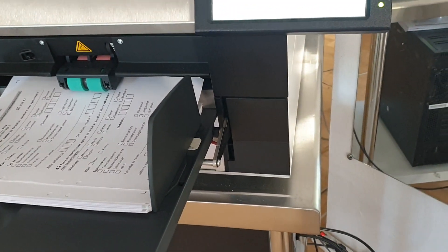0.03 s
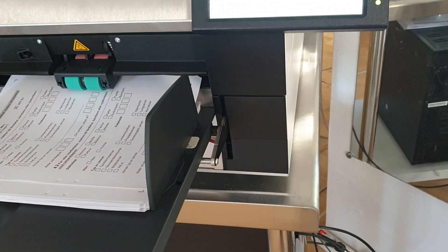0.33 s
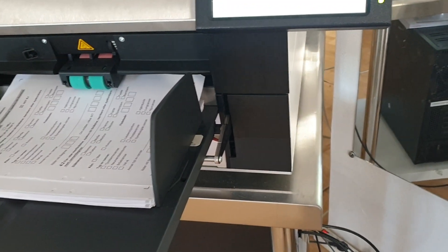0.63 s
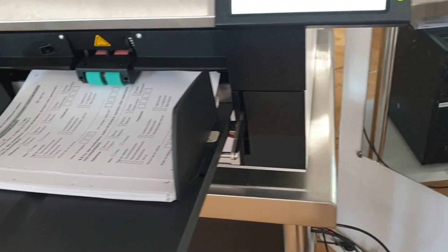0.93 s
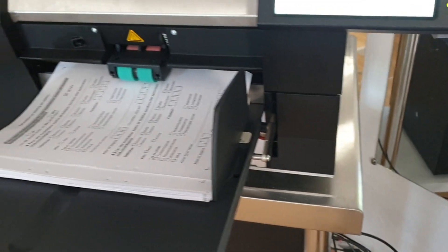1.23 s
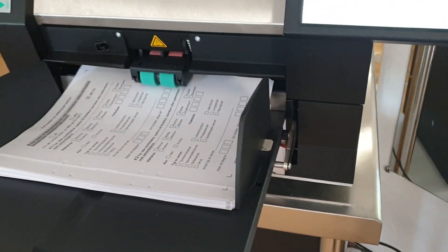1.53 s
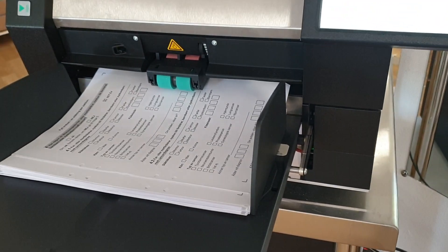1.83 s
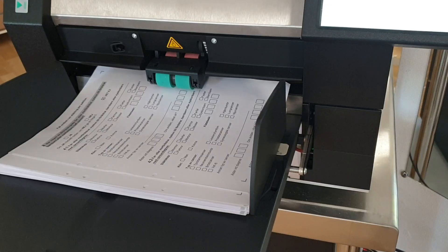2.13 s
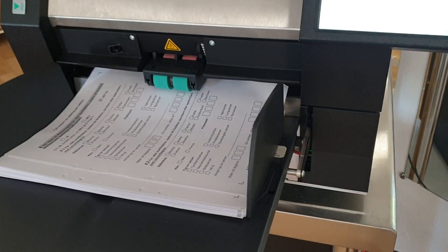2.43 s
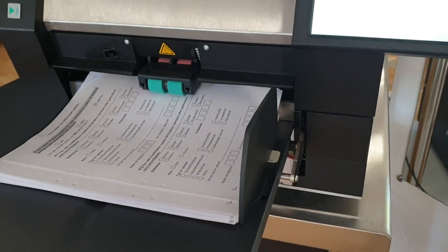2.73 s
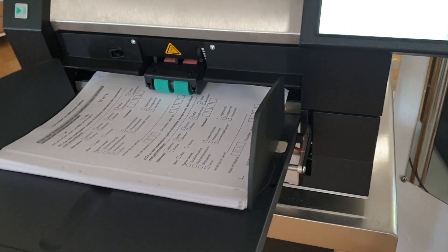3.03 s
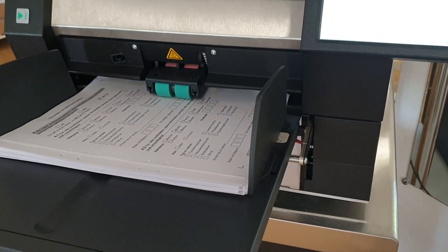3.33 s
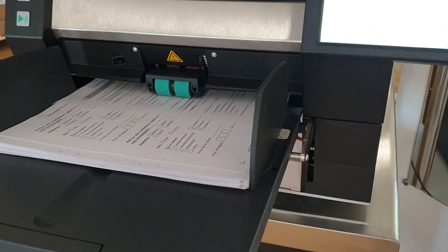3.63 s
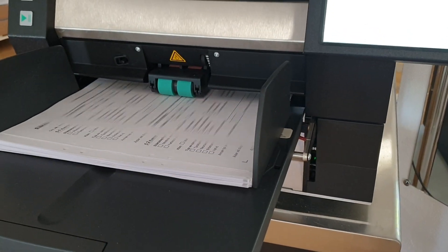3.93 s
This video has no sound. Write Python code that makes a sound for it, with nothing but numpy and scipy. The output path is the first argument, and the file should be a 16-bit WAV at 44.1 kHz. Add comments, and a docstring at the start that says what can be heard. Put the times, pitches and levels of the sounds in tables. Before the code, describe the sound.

A large office scanner clunks, whines up to a whirr and starts feeding paper.

```python
"""A faint fan and hum, with soft rustles: a large office scanner idles in a small room.
A clutch clunks in, ringing the frame and metal parts. Three drive motors whine up one after another,
their gears chattering through a critical speed, and belts and rollers settle into a steady whirr.
The feeder clacks, the tray booms and a first sheet slides off the stack.
The left microphone is the stronger."""
import sys
import numpy as np
from scipy import signal
from scipy.fft import rfft, irfft, next_fast_len
from scipy.io import wavfile
from scipy.ndimage import map_coordinates

SR = 44100
rng = np.random.default_rng(int(sys.argv[2]) if len(sys.argv) > 2 else 0)


def put_to_file(sound):
    """Save the sound as 16-bit audio at rate SR, in the file named by the first command-line argument."""
    columns = np.atleast_2d(sound).T  # one column per channel
    safe = np.clip(columns, -1, 1)
    whole_steps = np.round(safe * 32767)
    wavfile.write(sys.argv[1], SR, whole_steps.astype(np.int16))


N = 176400
T = np.arange(N) / SR


def amp(db):
    """Decibels to gain."""
    return 10 ** (np.asarray(db) / 20)


def unit(x):
    """Scale to rms 1."""
    return x / np.sqrt(np.mean(x ** 2) + 1e-20)


def in_time(rows):
    """Columns of a time curve, per sample."""
    time_s, *columns = np.transpose(rows)
    return [np.interp(T, time_s, column) for column in columns]


def at_hz(points, hz):
    """Read a spectrum on a log-frequency axis."""
    freq_hz, values = np.transpose(points)
    return np.interp(np.log(hz + 1e-9), np.log(freq_hz), values)


def drift(rate_hz):
    """Smooth random wander, rms 1."""
    hop, settle = 40, 2000
    pole = np.exp(-2 * np.pi * rate_hz * hop / SR)
    white = rng.standard_normal(N // hop + settle + 2)
    slow = signal.lfilter([1], [1, -2 * pole, pole ** 2], white)[settle:]
    return np.interp(np.arange(N) / hop, np.arange(len(slow)), unit(slow))


def narrow_noise(hz, width_hz, stages=1):
    """White noise through resonators in series, rms 1."""
    pole = np.exp(-np.pi * width_hz / SR)
    x = rng.standard_normal(N)
    for _ in range(stages):
        x = signal.lfilter([1, 0, -1], [1, -2 * pole * np.cos(2 * np.pi * hz / SR), pole ** 2], x)
    return unit(x)


def swell(start_s, level_db, attack_s, decay_s):
    """Envelope: up 20 dB per attack_s until start_s, then down 60 dB per decay_s."""
    rise_db = 20 * np.minimum(T - start_s, 0) / attack_s
    fall_db = 60 * np.maximum(T - start_s, 0) / decay_s
    return amp(level_db + rise_db - fall_db)


def room(x, wet_db, t60_s):
    """Direct sound plus a short diffuse tail, different per channel."""
    t = T[:SR // 2]
    tail = rng.standard_normal((2, len(t))) * amp(-60 * t / t60_s) * (t > .003)
    tail /= np.sqrt(np.sum(tail ** 2, axis=1, keepdims=True))
    return x + amp(wet_db) * signal.fftconvolve(x[None], tail, axes=1)[:, :N]


# left-right likeness of diffuse sound: freq_hz, coherence
COHERENCE = [(60, .8), (200, .92), (1000, .78), (3000, .5), (16000, .4)]

def noise(spectrum, flicker_db=0, size=N):
    """Stereo noise in third-octave bands with optional independent flicker, rms 1."""
    out, edges_hz = 0, 22 * 2 ** (np.arange(30) / 3)
    white = rng.standard_normal((2, 2, size + SR // 4))
    for k, (low, high) in enumerate(zip(edges_hz, edges_hz[1:])):
        band = signal.butter(2, [low, high], "band", fs=SR, output="sos")
        mid, side = signal.sosfilt(band, white[k % 2])[:, -size:]
        hz = np.sqrt(low * high)
        alike = at_hz(COHERENCE, hz)
        gain = amp(at_hz(spectrum, hz) + (flicker_db * drift(24)[:size] if flicker_db else 0))
        out += gain * (np.sqrt(1 + alike) * mid + np.sqrt(1 - alike) * side * [[1], [-1]])
    return unit(out)


# faint rustles, soft shuffles, low bump: start_s, level_db, attack_s, decay_s
RUSTLES = [(.44, -65.5, 0.059, 0.85), (.81, -65.5, .04, 0.37), (1.362, -54.5, 0.032, 0.61),
           (1.735, -59.5, 0.013, 0.34)]
SHUFFLES = [(.01, -58.5, 0.037, 0.45), (.78, -65.5, 0.099, 0.7)]
BUMPS = [(1.745, -43, 0.039, 0.61)]

def stirrings():
    """Rustles, shuffles, a thin hiss and a low bump swell and fade before the start."""
    bright = noise([(500, 10.5), (2500, -9), (5200, -3.5), (6800, -9.5), (9500, -1.5), (16000, -8)])
    dull = noise([(200, -3), (800, -6), (2800, -9), (5000, -28)])
    rustle = sum(swell(*row) for row in RUSTLES) * bright
    shuffle = sum(swell(*row) for row in SHUFFLES) * dull
    hiss = narrow_noise(hz=11100, width_hz=1200, stages=2)
    hiss *= swell(start_s=1.22, level_db=-73.5, attack_s=.41, decay_s=1.8)
    bump = sum(swell(*row) for row in BUMPS) * np.sin(2 * np.pi * 47 * T + 1.2 * drift(7.6))
    return rustle + shuffle + hiss + bump


# fan noise: freq_hz, density_db
FAN_SPECTRUM = [(25, -31), (42, -10), (60, -21), (100, -4), (140, 1), (300, -6), (640, -17), (1000, -19.5),
                (1300, -25), (2200, -23), (4000, -34.5), (7000, -43.5), (11000, -34)]

def fan():
    """The idling fan: a low rush and a narrow whine."""
    whine = amp(-73.5) * narrow_noise(hz=2185, width_hz=180, stages=2)
    return whine + amp(-57.5) * noise(FAN_SPECTRUM, flicker_db=1.2)


# mains and electronics: pitch_hz, level_db
HUM_TONES = [(53.8, -65.5), (80.7, -65.5), (980, -78.5), (2068, -76), (2137, -73.5), (3340, -85.5),
             (3860, -81.5), (10002, -87)]

def hum():
    """Mains and electronics tones, wavering in phase and level."""
    out = 0
    for hz, db in HUM_TONES:
        tone = np.sqrt(2) * np.sin(2 * np.pi * hz * T + .5 * drift(2.7))
        out += amp(db) * tone * (1 + .45 * drift(17))
    return out


# motor electronics: centre_hz, level_db
WHISTLES = [(13428, -77), (13780, -74), (14400, -77), (15100, -75), (15563, -71)]

def motor_electronics():
    """The running motors' electronics hiss in narrow bands."""
    fade_in = np.clip((T - 2.7) / .12, 0, 1)
    return fade_in * sum(amp(db) * narrow_noise(hz, width_hz=60) for hz, db in WHISTLES)


# belts and rollers running: time_s, level_db
WHIRR_LEVEL = [(2.34, -110), (2.4, -31.5), (2.6, -52), (2.8, -42), (3.22, -42), (3.38, -39.5), (3.7, -42.5),
               (4, -36.5)]
# their whirr: freq_hz, density_db
WHIRR_SPECTRUM = [(40, -21), (100, -25.5), (150, -2.5), (250, -9.5), (400, -4), (600, -7), (760, -16),
                  (1100, -6), (1600, -17), (2250, -18.5), (2900, -32), (3900, -28.5), (6000, -33.5),
                  (8500, -37.5), (12000, -33)]
# housing resonances: centre_hz, width_hz, level_db
HOUSING_RINGS = [(460.6, 21, -58), (606, 61, -64.5), (633.3, 10, -54), (1133, 103, -49.5),
                 (2300, 290, -63.5), (3710, 91, -58.5), (4440, 190, -70)]

def rollers():
    """Belts and rollers whirr and rattle the housing."""
    level_db, = in_time(WHIRR_LEVEL)
    settled_db = level_db[-SR:].mean()
    rattle = sum(amp(db) * narrow_noise(hz, width_hz) for hz, width_hz, db in HOUSING_RINGS)
    whirr = amp(level_db) * noise(WHIRR_SPECTRUM, flicker_db=3)
    return whirr + amp(level_db - settled_db) * room(rattle, wet_db=-4.5, t60_s=.54)


# sliding sheet, feed roller hum: time_s, level_db
SLIDE_LEVEL = [(3.55, -100), (3.58, -36), (3.66, -42.5), (3.78, -41), (3.84, -37.5), (3.89, -47),
               (3.94, -66), (3.965, -37.5), (4, -46)]
FEED_LEVEL = [(3.54, -100), (3.58, -47), (3.68, -52.5), (3.78, -39), (3.87, -42), (4, -53)]
# paper friction: freq_hz, density_db
PAPER_SPECTRUM = [(60, 10), (200, 11.5), (700, -2), (2000, 1), (6500, -4.5), (10000, -0.5), (16000, -3)]

def sheet_feed():
    """The feed roller hums while paper slides over paper."""
    roller_hz = 161.5 * (1 + .0081 * drift(8.4))
    roller = np.sqrt(2) * np.sin(2 * np.pi * np.cumsum(roller_hz) / SR)
    slide = noise(PAPER_SPECTRUM, flicker_db=1.5) * amp(1.14 * drift(100))
    return amp(in_time(SLIDE_LEVEL)[0]) * slide + amp(in_time(FEED_LEVEL)[0]) * roller


def tray_boom():
    """The tray booms under the feeder's blow."""
    envelope = swell(start_s=3.566, level_db=-28.5, attack_s=.0034, decay_s=.27)
    return envelope * np.sin(2 * np.pi * 204.6 * T + 1.47 * drift(37))


def struck(starts_s, hits_db, modes, spectrum, modes_db, dense_db,
           crack_t60_s, tail_db, tail_t60_s, clatter_db):
    """Each hit rings a part's modes, plus dense ringing: a short crack and a longer tail."""
    out, t = np.zeros((2, N + SR)), T[:SR]
    dense = unit(noise(spectrum, size=2 * SR) * amp(clatter_db * drift(165)[:2 * SR]))
    envelope = amp(dense_db) * (amp(-60 * t / crack_t60_s) + amp(tail_db - 60 * t / tail_t60_s))
    attack = 1 - np.exp(-t / .00014)
    for start_s, hit_db in zip(starts_s, hits_db):
        start, pick = int(start_s * SR), rng.integers(SR)
        ringing = envelope * dense[:, pick:pick + SR]
        for hz, db, t60_s in modes:
            decay = amp(modes_db + db + rng.normal(0, .4) - 60 * t / t60_s)
            ringing += decay * np.sin(2 * np.pi * hz * t) * rng.choice([-1, 1])
        out[:, start:start + SR] += amp(hit_db) * ringing * attack
    return out[:, :N]


# clutch and feeder contacts: start_s, thud_db, clang_db, snap_db
KNOCKS = [(2.35, -20, -63, -62), (2.3601, -18.5, -0.5, -16), (2.3647, -10, -5.5, -4.5),
          (2.367, -7, -24, -32), (2.381, -28, -17, -20), (2.398, -32, -18, -21), (2.4995, -17.5, -60, -60),
          (3.398, -43, -35, -35), (3.556, -15, -55, -54), (3.564, -31, -35, -11.5), (3.567, -33, -54, -6.5),
          (3.5705, -22, -35, -16), (3.5795, -24, -23, -14), (3.695, -50, -26.5, -21.5),
          (3.831, -48, -26, -19), (3.9468, -43, -20.5, -15)]
# modes of the struck parts: pitch_hz, gain_db, t60_s
FRAME_MODES = [(150.4, -13, 0.51), (550, 1.5, 0.077), (662, -5.5, 0.069), (1183, 2.5, 0.042),
               (1580, -6.5, .13), (1772, -9, 0.13)]
CLUTCH_MODES = [(3214, -5, .28), (3370, 6, .045), (3978, -13, .2), (5080, -13, .28), (5250, -3, .035),
                (5443, -15, .22), (5750, -18, .16), (8646, -20, .2), (9100, -7, .04)]
LATCH_MODES = [(2080, -2, 0.0087), (3835, 0, 0.03), (4185, -3, 0.023)]
# dense ringing around those modes: freq_hz, density_db
FRAME_SPECTRUM = [(60, -33), (140, -17), (270, -1), (550, 15), (1100, 1.5), (1800, -6), (2600, -14),
                  (6000, -42), (16000, -17)]
CLUTCH_SPECTRUM = [(300, -51), (1700, 3.5), (2600, -17), (3400, 9), (4400, -4.5), (5400, -4), (6900, -16),
                   (8700, -9.5), (16000, -25)]
LATCH_SPECTRUM = [(300, -20), (2000, 12), (4000, 8.5), (7000, 5), (9500, 7), (12000, 14.5), (16000, -10)]

def knocks():
    """Contacts thud in the frame, clang in the clutch metal and snap in the feeder latch."""
    starts_s, thud_db, clang_db, snap_db = np.transpose(KNOCKS)
    thud = struck(starts_s, thud_db, FRAME_MODES, FRAME_SPECTRUM, modes_db=-15, dense_db=-12.5,
                  crack_t60_s=.055, tail_db=-11, tail_t60_s=1, clatter_db=2.5)
    clang = struck(starts_s, clang_db, CLUTCH_MODES, CLUTCH_SPECTRUM, modes_db=-18, dense_db=-21,
                   crack_t60_s=.057, tail_db=-4, tail_t60_s=.56, clatter_db=1.5)
    snap = struck(starts_s, snap_db, LATCH_MODES, LATCH_SPECTRUM, modes_db=-13.5, dense_db=-12.5,
                  crack_t60_s=.02, tail_db=-24.5, tail_t60_s=.33, clatter_db=0)
    return thud + clang + snap


# hiss of the gear teeth: freq_hz, density_db
RASP_SPECTRUM = [(1000, 7), (2500, 8), (5500, 2), (8000, -1), (12000, 4), (16000, -17)]

def drive(run_up, partials, chatter_partials, jitter, rough, throb, grit,
          chatter_db, critical_hz, critical_width_hz, rasp_db=None):
    """Gear-mesh tone, throbbing once per pinion turn, and its chatter near the critical speed."""
    mesh_hz, level_db = in_time(run_up)
    phase = 2 * np.pi * np.cumsum(mesh_hz * (1 + jitter * drift(30.7))) / SR
    pinion_teeth, tone = 11, 0
    for k, db in partials:
        partial = np.sin(k * phase) * (1 + rough * drift(63))
        tone += amp(db) * (partial + grit * drift(130) * np.cos(k * phase))
    tone *= 1 + throb * np.sin(phase / pinion_teeth)
    chatter = sum(amp(db) * np.sin(k * phase) * (1 + .4 * drift(90)) for k, db in chatter_partials)
    if rasp_db is not None:
        chatter += amp(rasp_db) * noise(RASP_SPECTRUM)[0] * (1 + np.sin(phase))
    chatter *= amp(chatter_db) / (1 + ((mesh_hz - critical_hz) / critical_width_hz) ** 4)
    fade_in = np.clip((T - run_up[0][0]) / .022, 0, 1)
    envelope = np.sqrt(2) * amp(level_db) * fade_in
    return envelope * tone, envelope * chatter


# gear-mesh tone of each drive: time_s, pitch_hz, level_db
MAIN_RUN_UP = [(2.39, 220, -46), (2.44, 400, -37), (2.458, 465, -29.5), (2.49, 585, -31),
               (2.52, 750, -32.5), (2.537, 860, -28), (2.572, 990, -24.5), (2.607, 1130, -20),
               (2.626, 1225, -24), (2.655, 1154, -34), (2.72, 1118, -49)]
SECOND_RUN_UP = [(2.48, 380, -38), (2.54, 530, -36.5), (2.6, 690, -40), (2.66, 850, -38), (2.705, 985, -32),
                 (2.73, 1035, -30), (2.8, 1210, -44.5), (2.84, 1160, -53.5), (4, 1145, -60)]
BELT_RUN_UP = [(2.6, 617, -57), (2.67, 740, -60), (2.72, 850, -46), (2.78, 1000, -44.5), (2.87, 1159, -43),
               (3.1, 1150, -41.5), (3.3, 1147, -40.5), (4, 1151, -44)]
# partials of the tones and of the chatter: mesh_multiple, gain_db
GEAR_PARTIALS = [(1, -1), (2, -33)]
BELT_PARTIALS = [(.28, -10), (.355, -12), (.5, -11), (.795, -14), (.897, -16), (1, .3), (2, -19), (4, -32)]
MAIN_CHATTER = [(2, 0), (3, -12), (4, -16), (5, -17)]
SECOND_CHATTER = [(2, -14), (3, 0), (4, -16), (5, -20)]
BELT_CHATTER = [(2, 0)]

def motors():
    """Three drives run up in turn; the first two reverberate in the room."""
    main = drive(MAIN_RUN_UP, GEAR_PARTIALS, MAIN_CHATTER, jitter=.008, rough=.28, throb=.5, grit=.25,
                 chatter_db=-13.5, critical_hz=1078, critical_width_hz=42, rasp_db=-15)
    second = drive(SECOND_RUN_UP, GEAR_PARTIALS, SECOND_CHATTER, jitter=.005, rough=.2, throb=.6,
                   grit=.25, chatter_db=-10, critical_hz=1010, critical_width_hz=30, rasp_db=-17)
    belt = drive(BELT_RUN_UP, BELT_PARTIALS, BELT_CHATTER, jitter=.0005, rough=.14, throb=.15, grit=.05,
                 chatter_db=-6, critical_hz=910, critical_width_hz=110)
    whine, chatter = np.add(main, second)
    return room(whine, wet_db=-6.5, t60_s=.32) + room(chatter, wet_db=-6.5, t60_s=.18) + sum(belt)


def scene():
    """The idle background plus the start-up and first feed, in stereo."""
    background = stirrings() + fan() + hum()
    return background + knocks() + motors() + motor_electronics() + rollers() + sheet_feed() + tray_boom()


# right microphone relative to left: freq_hz, gain_db
RIGHT_MIC = [(60, -7), (200, -7.5), (400, -9), (1200, -7), (2400, -7.5), (4400, -6), (6000, -11),
             (8200, -26), (11000, -21), (15000, -17)]
# phase scatter from nearby surfaces: freq_hz, spread_rad
PHASE_SCATTER = [(300, .1), (1200, .45), (2200, 1.7), (5000, 2.4)]

def record(dry):
    """The right microphone is weaker, duller and phase-scattered; both lose deep bass and the very top."""
    size = next_fast_len(N + SR // 4)
    hz = np.fft.rfftfreq(size, 1 / SR)
    ripple = map_coordinates(rng.standard_normal(64), [hz / 400], order=3)
    response = amp(at_hz(RIGHT_MIC, hz)) * np.exp(1j * at_hz(PHASE_SCATTER, hz) * ripple)
    right = irfft(rfft(dry[1], size) * response, size)[:N]
    pair = amp(db=1) * np.array([dry[0], right])
    low_cut = signal.butter(4, 35, "high", fs=SR, output="sos")
    high_cut = signal.ellip(12, .1, 80, 16000, fs=SR, output="sos")
    return signal.sosfilt(high_cut, signal.sosfilt(low_cut, pair))


dry = scene()
out = record(dry)
put_to_file(out)
```